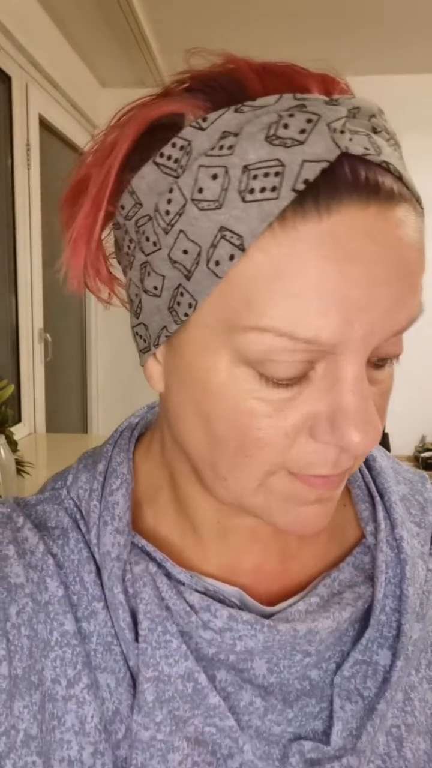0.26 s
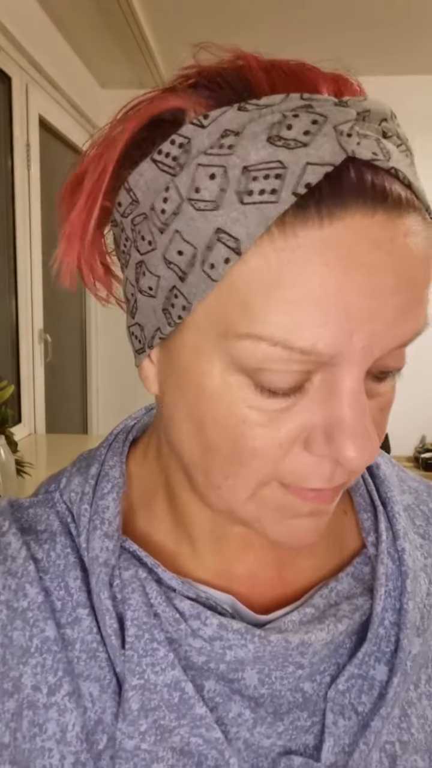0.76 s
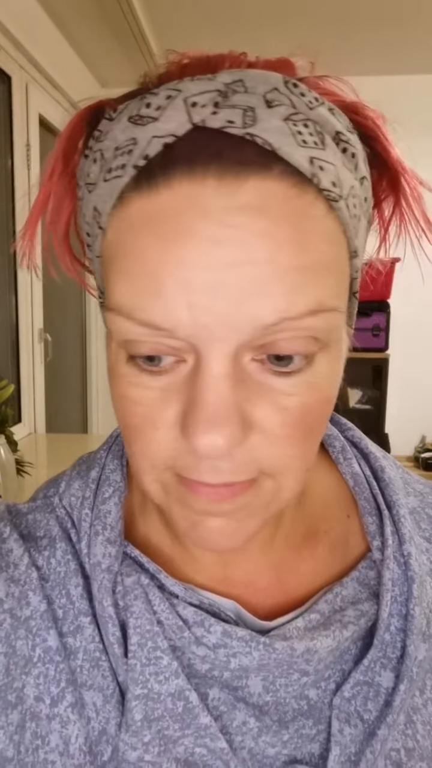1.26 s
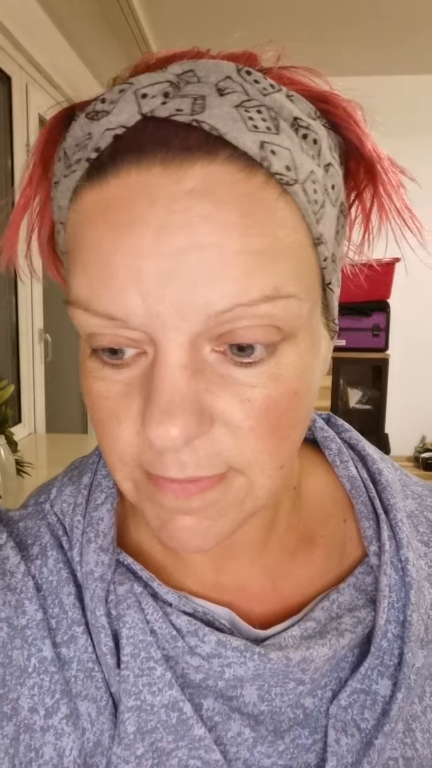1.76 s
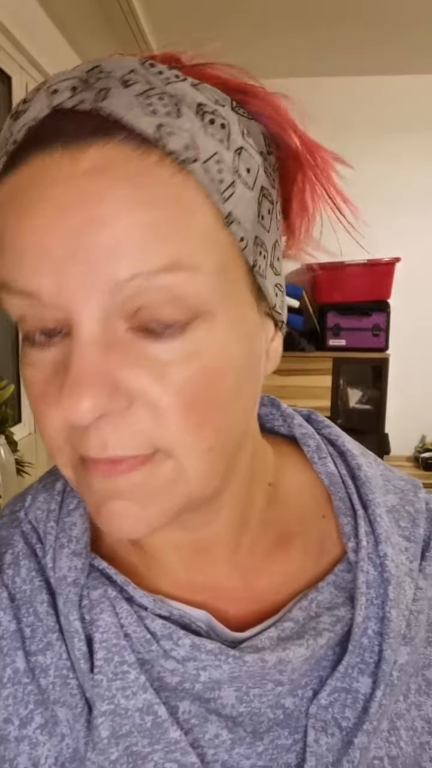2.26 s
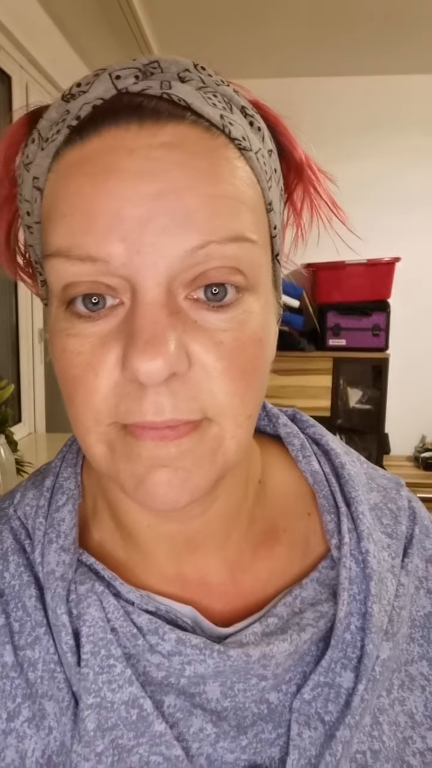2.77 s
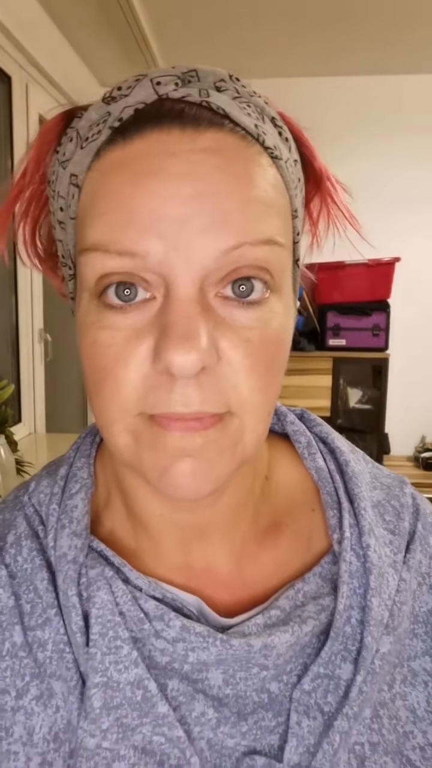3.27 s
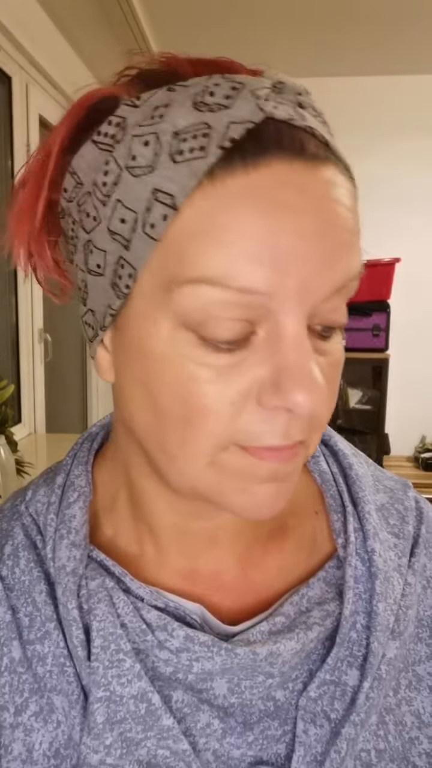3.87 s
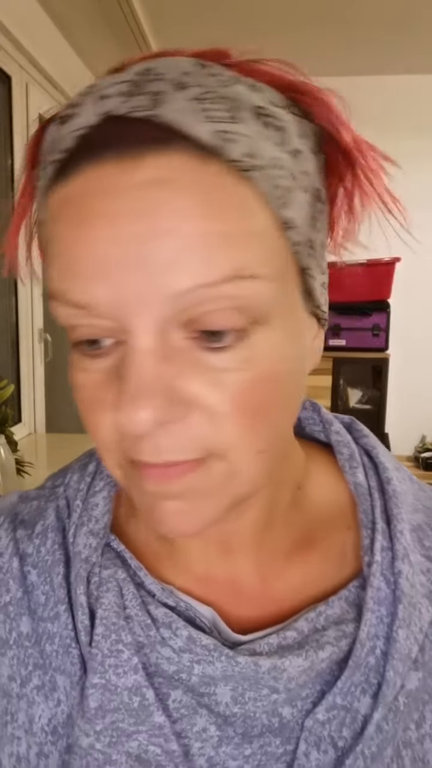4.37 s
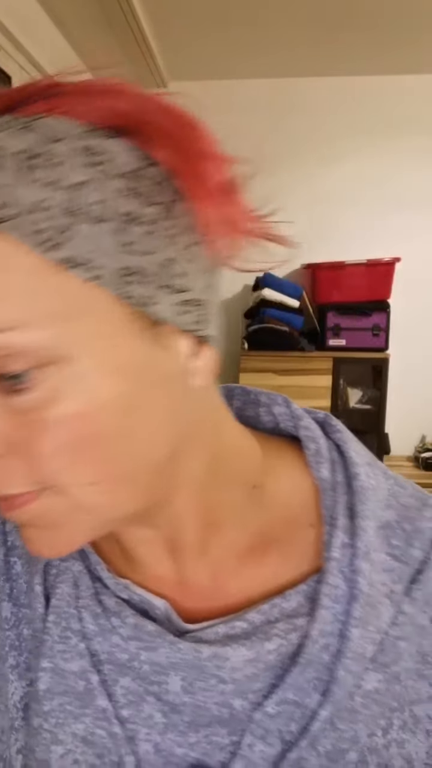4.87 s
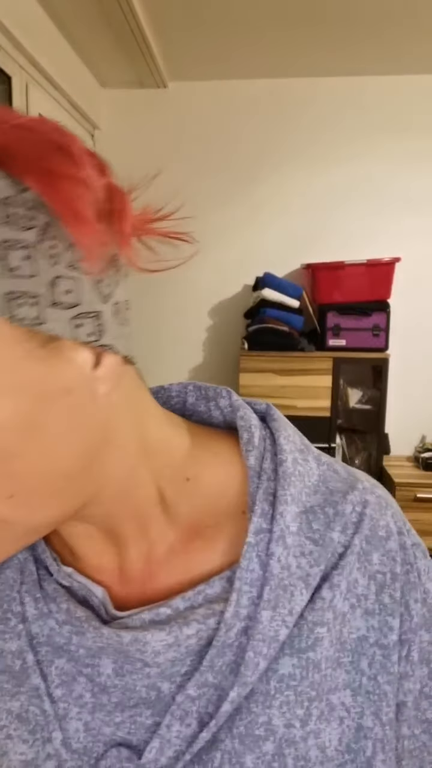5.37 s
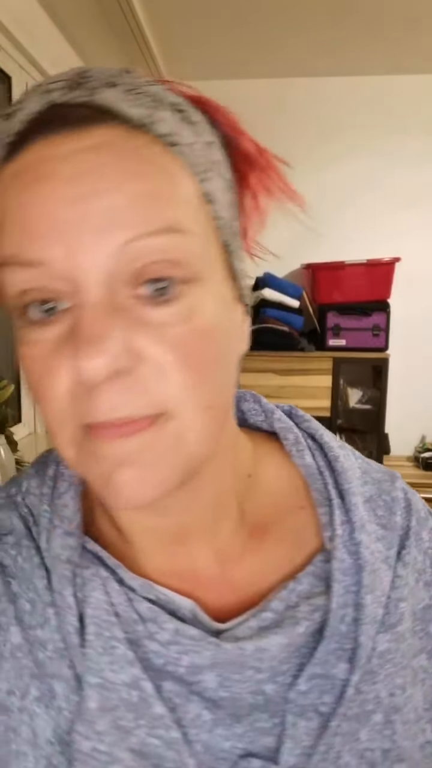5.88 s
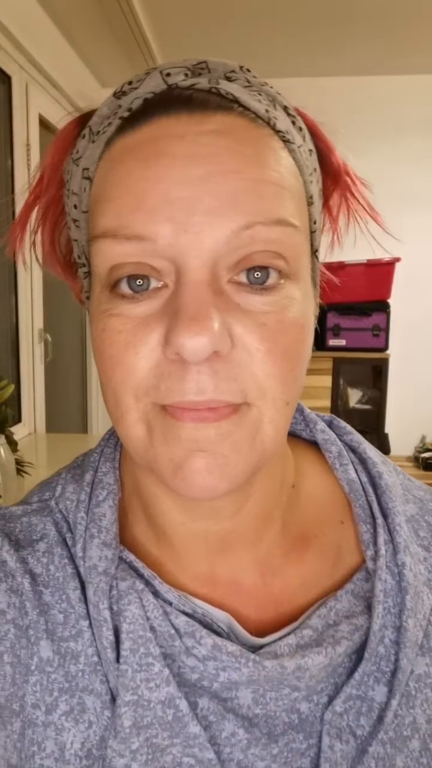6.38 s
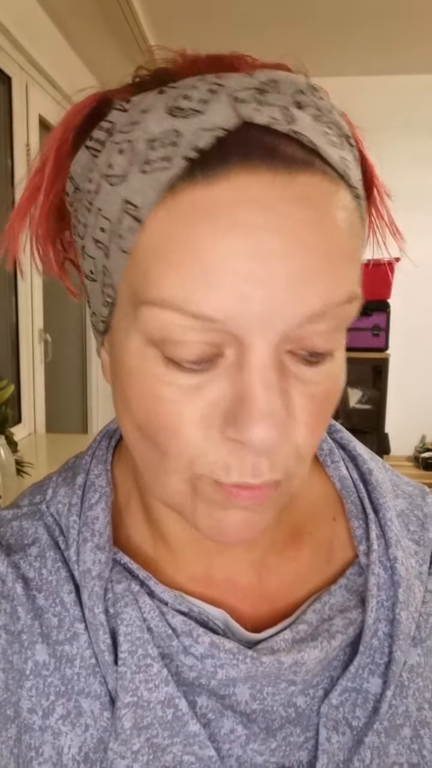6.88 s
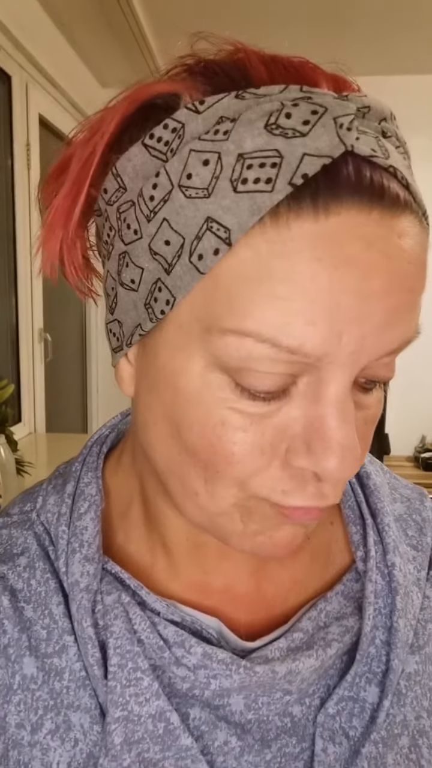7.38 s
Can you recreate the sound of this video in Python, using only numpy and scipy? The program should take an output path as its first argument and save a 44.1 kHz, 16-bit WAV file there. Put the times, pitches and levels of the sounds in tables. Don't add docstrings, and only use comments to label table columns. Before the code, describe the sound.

A quiet furnished room, close phone microphone, soft steady hiss and low room tone. At 0.06 s a glass jar clinks clearly with a hollow knock. Sliding leads to a firm flat knock at 0.4, then a tight burst from 0.55 to 0.68, the loudest, with sharp plastic cracks, low thuds and a short rattle. A firm drop falls at 1.06, light taps around 1.4, small clicks and a scrape at 1.55 to 1.7. A case clatters down hard at 2.4, with a very faint glass clink at 2.53. Paired taps come at 3.37 to 3.58, a dull bump at 4.2 and a small tick at 4.4. Around 5 to 5.25 there are tiny bright ticks and cloth brushing. From 5.98 to 7.03 items shuffle in a tray with many soft, dull knocks and a brief low squeak near 6.5. Light plastic clicks at 7.25 to 7.45 end it.

```python
import sys
import numpy as np
from scipy import signal
from scipy.fft import rfft, irfft, next_fast_len
from scipy.io import wavfile
from scipy.ndimage import uniform_filter1d

SR = 44100
rng = np.random.default_rng(int(sys.argv[2]) if len(sys.argv) > 2 else 0)


def gain_from_db(level_db):
    decades = np.asarray(level_db, float) / 20
    return 10 ** decades


def file_out(sig):
    cols = np.atleast_2d(sig).T
    lim = np.clip(cols, -1, 1)
    pcm = np.round(lim * 32767).astype(np.int16)
    wavfile.write(sys.argv[1], SR, pcm)


N = 335733
LENGTH, TOP_HZ = 8192, 15250
FADE_DB, STILL_DB = 17.5, -75
SPREAD_DB = 3
HIT_DELAY_S = .0008


def peak_one(x):
    return x / (np.max(np.abs(x)) + 1e-12)


def rms_one(x):
    return x / np.sqrt(np.mean(x ** 2) + 1e-20)


def at_hz(points, hz):
    f, value = np.transpose(points)
    return np.interp(np.log(hz), np.log(f), value)


def band(x, low_hz, high_hz):
    return signal.sosfilt(signal.butter(2, [low_hz, high_hz], "band", fs=SR, output="sos"), x)


def coloured(spectrum):
    size = next_fast_len(N)
    hz = np.maximum(np.fft.rfftfreq(size, 1 / SR), 1)
    inside = (hz > spectrum[0][0]) & (hz < min(spectrum[-1][0], TOP_HZ))
    white = rfft(rng.standard_normal(size))
    return rms_one(irfft(white * gain_from_db(at_hz(spectrum, hz)) * inside, size)[:N])


def flicker(rate_hz):
    knots = rng.standard_normal(2000)
    return np.interp(np.arange(N) / SR * rate_hz, np.arange(len(knots)), knots)


def humps(s, level_db, swell_s, hold_s, fade_s, rest_db):
    step = 32
    t = np.arange(0, N, step)[:, None] / SR
    away = np.maximum((s - t) / swell_s, (t - s - hold_s) / fade_s)
    each_db = level_db - FADE_DB * np.maximum(away, 0)
    loudest_db = np.maximum(each_db.max(axis=1), rest_db)
    leader = each_db.argmax(axis=1)[np.arange(N) // step]
    return np.interp(np.arange(N) / SR, t[:, 0], loudest_db), leader


def struck(push, modes, strengths_db):
    t = np.arange(LENGTH) / SR
    hz, level_db, t60 = np.transpose(modes)[:, :, None]
    rings = gain_from_db(level_db + strengths_db[:, None] - 60 * t / t60) * np.sin(2 * np.pi * hz * t)
    return peak_one(signal.fftconvolve(rings.sum(axis=0), push)[:LENGTH])


def add(out, sound, s):
    i = round(s * SR)
    out[i:i + LENGTH] += sound[:N - i]


# t/s, knock peak/dB, crack re knock/dB, knock pitch f/Hz
DROPS = [
    (0.3949, -27.5, -17, 406),
    (.597, -34, -4, 590),
    (.638, -17.5, -2.5, 610),
    (1.063, -24.5, -5.5, 435),
]
CLATTERS = [(1.524, -56.5, -8, 594), (1.556, -49, 5, 515), (1.66, -50.5, -15, 285), (1.736, -59, -17, 365),
            (2.3923, -22.5, -12, 407), (2.397, -23, -5.5, 410), (3.041, -56.5, 0.5, 600),
            (5.835, -52.5, 6, 450), (7.246, -38, -12, 600), (7.427, -48, 9, 370)]
HOLLOWS = [(.064, -27.5, 5.5, 718), (0.409, -34, -36, 276), (.559, -21.5, -15.5, 445),
           (0.938, -43, -29, 433), (1.385, -32.5, 0.5, 418), (2.116, -52.5, -2, 370),
           (2.527, -42.5, 8.5, 248), (3.508, -44, -21, 393), (3.532, -32.5, -5, 305), (3.807, -52, -6, 458),
           (4.315, -54, -8, 247), (4.374, -45.5, -22, 243), (4.395, -50.5, 1, 283), (5.978, -34, -39, 642)]
TAPS = [(.4, -21, -5.5, 323), (0.567, -35, -3, 420), (.591, -26.5, -5.5, 610), (.657, -23, 4.5, 407),
        (.676, -29, -9, 406), (1.3687, -28.5, -10, 450), (1.428, -37.5, -4.5, 505), (1.692, -50.5, -6, 290),
        (2.041, -59, -22, 430), (2.156, -48.5, -5, 520), (2.382, -32, -9, 430), (3.3654, -33.5, 4, 487),
        (3.472, -38.5, -7.5, 434), (3.5788, -31.5, -7.5, 443), (4.988, -58.5, 16.5, 470),
        (5.038, -62.5, 14, 368), (5.932, -49.5, -3, 498), (6.348, -47.5, -6.5, 474),
        (7.264, -33.5, -8, 429.4), (7.286, -30.5, -6, 394), (7.446, -41, 0, 310)]
BUMPS = [
    (1.161, -51.5, 2.5, 422),
    (2.367, -43.5, 8, 332),
    (3.377, -30, -42, 450),
    (3.478, -38, -20, 406),
    (4.2054, -32.5, -14, 325),
    (5.177, -52, 5, 394),
]
SHUFFLES = [(5.997, -31.5, -8, 306), (6.029, -40, -16, 390), (6.058, -31.5, -17, 370),
            (6.125, -42.5, -9, 435), (6.214, -36, 1.5, 600), (6.22, -26.5, -13, 498), (6.23, -31, -21, 510),
            (6.257, -34.5, -13, 520), (6.309, -47.5, -4.5, 490), (6.431, -45.5, -37, 406),
            (6.462, -38, -19, 425), (6.498, -45, -3.5, 484), (6.603, -35, 1, 424), (6.776, -33, -17.5, 317),
            (6.843, -37.5, -14, 340), (6.956, -35.5, -8, 460), (7.028, -30.5, -12.5, 380)]
# lid/dB, shell re knock/dB, lid and shell share of crack dB, share of free ring time
GRIPS = [
    (0, -8, 0.017, 0.05, 1),
    (2, -1, 0.017, 0.055, 1),
    (-3, -13, 0.091, 0.18, 1),
    (-13, -4, .02, 0.22, 0.96),
    (-8.5, -18, 0.096, 0.17, .9),
    (-10.5, -18, 0.32, 0.19, 1),
]


def all_contacts():
    kinds = [DROPS, CLATTERS, HOLLOWS, TAPS, BUMPS, SHUFFLES]
    for rows, (lid_db, shell_db, lid_share, shell_share, free) in zip(kinds, GRIPS):
        for s, knock_db, crack_db, hz in rows:
            lid = lid_db + lid_share * crack_db
            shell = shell_db + shell_share * crack_db
            yield s, knock_db, lid, shell, crack_db, hz, free


# f/Hz, level/dB, t60/s
TABLE = [(238, -22, 0.049), (340.5, -8.5, 0.11), (420.3, -1.5, 0.11), (455, -9.5, 0.089),
         (516.4, -6.5, 0.12), (600, -0.5, 0.057)]
# f/Hz, level/dB, t60/s
LID = [(530, 12, 0.0047), (789, -4, 0.059), (868, -0.5, .05), (908, 8, 0.028), (1020, -1, 0.026),
       (1131, -6.5, 0.047)]
# f/Hz, level/dB, t60/s
CASE = [(1300, 14.5, 0.049), (1526, 14.5, 0.024), (1733, 11, 0.023), (1935, 20, 0.0054), (2490, 9, 0.013),
        (2720, -10, 0.077), (3360, -66, 0.03)]
# f/Hz, level/dB per Hz
CRACK = [(1880, -4), (3200, 3), (4050, -8), (4830, 5.5), (6520, -7), (7930, 0.5), (8690, -5.5),
         (10300, -19.5), (12100, -19.5), (13200, -16), (15200, -21)]


def contacts():
    out, t, crack = np.zeros(N), np.arange(LENGTH) / SR, coloured(CRACK)
    settle = np.exp(-t / .003)
    snap_shape = (1 - np.exp(-t / 0.00038)) * (0.65 * np.exp(-t / 0.00054) + 0.29 * np.exp(-t / 0.0038))
    table_hz = np.array(TABLE)[:, 0]
    for s, knock_db, lid_db, shell_db, crack_db, hollow_hz, free in all_contacts():
        uneven = rng.standard_normal(LENGTH) ** 3
        chance_db = SPREAD_DB * rng.standard_normal((3, len(CASE)))
        push = (uneven * settle * 0.2 + (t == 0) * 2.63)[:LENGTH // 4]
        soft = np.convolve(push, np.hanning(round(.5 * SR / hollow_hz) + 2))
        nearness_db = -8.0 * np.abs(np.log2(table_hz / hollow_hz))
        body = np.array(TABLE + [(hollow_hz, 3.0, 17.0 / hollow_hz)]) * [1, 1, free]
        knock = struck(soft, body, np.append(nearness_db + chance_db[0, :len(TABLE)], 0))
        knock = peak_one(band(band(knock, 0.58 * hollow_hz, 5.4 * hollow_hz), 235, 1200))
        lid = peak_one(band(struck(push, LID, chance_db[1, :len(LID)]), 532, 1350))
        shell = peak_one(band(struck(push, CASE, chance_db[2, :len(CASE)]), 1490, 2960))
        i = min(round(s * SR), N - LENGTH)
        snap = peak_one(crack[i:i + LENGTH] * snap_shape)
        snap = peak_one(band(snap, 1500 * 2 ** np.clip(crack_db / 5.0, 0, 1.5), TOP_HZ))
        hit = knock + gain_from_db(lid_db + 1.5) * lid + gain_from_db(shell_db) * shell + gain_from_db(crack_db) * snap
        add(out, gain_from_db(knock_db) * hit, s + HIT_DELAY_S)
    return out


# t/s, peak/dB, f/Hz
THUDS = [(0.065, -34.5, 260), (0.397, -34.5, 124), (0.562, -40, 136), (0.637, -29.5, 236),
         (0.657, -30, 227), (1.06, -42, 134), (1.37, -49, 70.4), (2.117, -47.5, 42.5), (2.393, -28, 198.7),
         (3.533, -38.5, 236), (4.205, -42.5, 242)]


def thuds():
    out = np.zeros(N)
    for s, level_db, hz in THUDS:
        push = np.hanning(round(.4 * SR / hz))
        modes = [(hz, 0, .13), (1.77 * hz, -4, .09)]
        add(out, gain_from_db(level_db + 2.0) * struck(push, modes, np.zeros(2)), s)
    return out


# t/s, peak/dB, f/Hz, t60/s
PINGS = [(0.4007, -21.5, 6020, 0.022), (1.385, -32, 5400, 0.013), (4.9885, -45, 5350, 0.014),
         (1.557, -23, 1620, 0.012), (1.6596, -33, 1600, 0.023), (5.8357, -38.5, 1280, 0.036),
         (7.2468, -24, 1570, 0.01), (7.444, -27.5, 1420, 0.01), (.383, -40, 7400, .02),
         (0.411, -43, 4600, 0.012), (0.5604, -28, 4670, 0.011), (.6385, -15, 4870, 0.0096),
         (.6585, -14, 7640, 0.0075), (.6587, -16, 2070, .012), (.677, -33, 4900, 0.015),
         (1.525, -46, 3040, .012), (1.5572, -36.5, 2670, 0.019), (1.661, -37, 940, 0.026),
         (1.735, -42, 1290, .015), (2.368, -47, 4850, 0.0081), (2.3935, -29, 4800, 0.0071),
         (2.3985, -24, 4660, 0.0073), (2.538, -35, 4520, 0.014), (2.5375, -53, 2780, .15),
         (5.178, -26.5, 6000, .004), (5.979, -49, 3000, 0.044), (6.215, -31.5, 3190, .012),
         (6.348, -45.5, 1774, 0.013), (6.603, -36, 3150, .012), (6.955, -42, 7500, 0.011),
         (7.2622, -34, 7450, 0.013), (7.287, -23, 940, 0.021), (4.99, -50, 13400, .004),
         (.66, -18, 983, 0.041), (1.064, -24, 1810, 0.0083), (1.3705, -30, 2800, .012),
         (1.385, -41, 7530, .012), (3.348, -44, 8040, .008), (3.366, -37, 5190, 0.01),
         (3.475, -45, 7900, .012), (3.475, -36, 1410, .015), (3.512, -43, 1300, .02),
         (4.318, -46, 14500, .006), (4.318, -50, 4900, .006), (7.2475, -33, 800, 0.024),
         (6.0, -46, 5040, 0.034), (6.2155, -30.5, 5000, 0.017), (2.397, -20.5, 1500, 0.027),
         (2.13, -62, 1200, .02), (2.258, -53, 1200, .02), (4.99, -46, 2020, 0.0079)]


def pings():
    out = np.zeros(N)
    for s, level_db, hz, t60 in PINGS:
        size = round(1.5 * SR / hz) + 2
        push = np.hanning(size) * np.sin(2 * np.pi * hz / SR * np.arange(size))
        modes = [(hz, 0, t60), (0.75 * hz, -4, t60)]
        add(out, gain_from_db(level_db - 6.0) * struck(push, modes, np.zeros(2)), s + HIT_DELAY_S)
    return out


# t/s, peak/dB
CLINKS = [
    (0.0644, -21.5),
    (2.528, -38),
]
# f/Hz, level/dB, t60/s
JAR = [(2792, 13.5, 0.06), (2780, -3, 0.14), (3100, 0, 0.089), (4110, -6.5, 0.2), (4870, -25, .08),
       (5580, -19.5, 0.055), (6230, 14, 0.051), (6540, 14, 0.037), (6650, 0, 0.36), (8090, -21, .12),
       (11250, -11, 0.19)]


def jar():
    out = np.zeros(N)
    for s, level_db in CLINKS:
        add(out, gain_from_db(level_db + 0.5) * struck(np.ones(1), JAR, rng.standard_normal(len(JAR))), s)
    return out


# t/s, level/dB, fade/s, upper edge f/Hz
RATTLES = [(.068, -48, 0.048, 6500), (.4, -46, 0.041, 3000), (.643, -39, 0.018, 4000),
           (.665, -40, 0.063, 5900), (1.068, -48, .05, 2480), (2.397, -37.5, .04, 2315),
           (3.37, -55.5, 0.054, 3000), (3.585, -55, 0.054, 3000), (6.0, -58.5, 0.054, 1500),
           (6.225, -56, 0.08, 1600), (7.29, -52, 0.036, 2000)]


def rattles():
    out, t = np.zeros(N), np.arange(LENGTH) / SR
    knocks_per_s, low_hz = 2500, 520
    for s, level_db, fade_s, top_hz in RATTLES:
        knocks = (rng.random(LENGTH) < knocks_per_s / SR) * rng.standard_normal(LENGTH)
        knocks = knocks * gain_from_db(3.8 * rng.exponential(1, LENGTH))
        shower = rms_one(band(knocks + 1e-18, low_hz, top_hz))
        add(out, gain_from_db(level_db - FADE_DB * t / fade_s) * (1 - np.exp(-t / 0.0015)) * shower, s)
    return out


def friction(rows, width_hz, upper_db):
    s, level_db, fade_s, hz = np.transpose(rows)
    swell_s = 0.27 * fade_s
    level_db, leader = humps(s, level_db, swell_s, 0, fade_s, rest_db=-120)
    level = uniform_filter1d(gain_from_db(level_db), size=300)
    pitch_hz = hz[leader]
    turn = 2 * np.pi * np.cumsum(pitch_hz) / SR
    low_pass = signal.butter(2, width_hz, fs=SR, output="sos")
    wide = signal.sosfilt(low_pass, rng.standard_normal((2, N)))
    main = wide[0] * np.cos(turn) + wide[1] * np.sin(turn)
    upper = gain_from_db(upper_db) * wide[1] * np.cos(1.8 * turn) * (pitch_hz < TOP_HZ / 4)
    return level * gain_from_db(-3.5 + 4.0 * flicker(80)) * rms_one(main + upper)


# t/s,
# level/dB, fade/s, resonance f/Hz
SCRAPES = [(.32, -58.5, 0.077, 1300), (1.57, -52.5, 0.064, 1502), (1.664, -42.5, 0.0098, 1472),
           (1.69, -53, 0.094, 1450), (1.874, -55.5, 0.04, 1523), (2.11, -65.5, .25, 1210),
           (2.254, -55.5, 0.039, 1200), (2.41, -43.5, 0.09, 1400), (7.04, -51, 0.041, 1220),
           (5.24, -54, 0.038, 4340), (6.505, -53.5, 0.025, 3000), (1.84, -55.5, 0.04, 1347),
           (5.19, -54.5, .04, 6100), (5.22, -57.5, 0.049, 13400), (4.39, -56.5, .08, 7700),
           (6.06, -59, 0.068, 5000)]


def scrapes():
    return friction(SCRAPES, width_hz=183, upper_db=-19)


# t/s, level/dB, fade/s, resonance f/Hz
SQUEAKS = [(.29, -63, .12, 3520), (2.12, -60.5, .15, 1200), (3.82, -67, .08, 1180),
           (5.28, -68.5, 0.33, 350), (6.16, -68.5, .08, 1870), (6.2, -60, 0.057, 1880),
           (6.4, -67, 0.058, 1850), (5.83, -59, 0.0616, 330), (6.49, -44.5, .07, 520),
           (6.54, -67, .03, 2700)]


def squeaks():
    return friction(SQUEAKS, width_hz=42, upper_db=-30)


# t/s, level/dB, fade before and after/s
LEANS = [(0, -43, 0.15), (.4, -46.5, 0.35), (.53, -44, 0.11), (.66, -38.5, 0.13), (.78, -47.5, 0.17),
         (1.02, -49.5, 0.47), (1.55, -65, 0.94), (2.15, -57.5, 0.15), (2.41, -49.5, 0.073), (2.69, -68, .3),
         (3.409, -63.5, 0.5), (3.6, -50, 0.14), (4.26, -51.5, 0.2), (4.6, -66, 0.69), (5.2, -69.5, .6),
         (5.62, -65, 0.56), (5.98, -58.5, 0.14), (6.3, -61, 0.9), (6.6, -63, 0.54), (6.06, -53.5, 0.13),
         (7.5, -62, 0.22), (6.95, -62.5, 0.35), (7.27, -56, 0.13)]
# t/s, level/dB, fade before and after/s, plastic scuff re drag/dB
SLIDES = [(.03, -53, 0.41, -0.5), (.36, -49.5, 0.21, -6), (.53, -39, 0.062, -9.5), (.78, -46, 0.17, -5.5),
          (1.02, -53.5, 0.33, -9), (1.55, -57.5, 0.26, -7.5), (1.88, -63, 0.15, -6), (2.2, -60.5, 0.2, -3),
          (2.43, -60, 0.22, -2.5), (3.41, -58.5, 0.3, -7), (3.52, -47, 0.1, -5), (3.65, -48.5, 0.1, -7.5),
          (4.09, -72.5, 0.2, 5), (4.26, -58, .3, -18), (5.17, -64, 0.19, -17), (5.98, -49.5, 0.073, -13),
          (6.17, -55, 0.33, -12), (6.35, -62.5, 0.43, -6), (6.59, -54, 0.26, -11.5),
          (6.95, -54.5, 0.34, -15.5), (7.3, -57, 0.26, -8), (7.48, -51, 0.096, -6)]
# f/Hz, level/dB per Hz
RUMBLE = [(21, -7), (35, -16), (59, -15.5), (129, 1.5), (216, -4), (280, -18), (360, -60), (620, -120)]
DRAG = [(140, -36), (240, -1), (413, 10), (598, -1.5), (683, -7), (771, -24), (900, -28), (1170, -34),
        (1980, -120)]
SCUFF = [(410, -59), (700, -3), (1070, -4.5), (1320, -6), (1740, -9), (2020, -17), (2800, -9.5),
         (3640, -59), (6160, -120)]
RUSTLE = [(1180, -18), (2000, -7.5), (2330, -22.5), (3010, -3), (3910, -11), (4300, -2.5), (4640, -1.5),
          (6740, -5), (7600, 2.5), (9000, -10.5), (11900, -13.5), (13500, -7), (15200, -9)]


def sliding():
    s, lean_db, fade_s = np.transpose(LEANS)
    rumble_db, _ = humps(s, lean_db, fade_s, 0, fade_s, STILL_DB)
    s, slide_db, fade_s, plastic_db = np.transpose(SLIDES)
    drag_db, _ = humps(s, slide_db, fade_s, 0, fade_s, STILL_DB)
    scuff_db, _ = humps(s, slide_db + plastic_db, fade_s, 0, 0.77 * fade_s, STILL_DB - 3)
    grain = flicker(70)
    rumble = gain_from_db(rumble_db - 1.5 + 2 * flicker(30)) * coloured(RUMBLE)
    drag = gain_from_db(drag_db - 6.5 + 1.6 * flicker(33)) * coloured(DRAG)
    scuff = gain_from_db(scuff_db - 1.5 + 2 * grain) * coloured(SCUFF)
    rustle = gain_from_db(scuff_db - 11.5 + grain + flicker(160)) * coloured(RUSTLE)
    return rumble + drag + scuff + rustle


# t/s, level/dB, swell/s, hold/s, fade/s
STROKES = [(.0, -60, .01, 0.045, .13), (.5, -67, 0.26, 0.058, 0.091), (.665, -51, 0.0025, .002, 0.013),
           (.7, -67, .02, 0.018, 0.059), (1.0, -69, 0.029, 0.061, 0.34), (1.55, -70, 0.043, .02, 0.14),
           (2.14, -66, 0.028, 0.13, .04), (2.559, -63, 0.061, 0.011, 0.077),
           (3.63, -64.5, 0.26, 0.017, 0.016), (4.395, -56, 0.082, 0.01, 0.11),
           (5.18, -48.5, 0.043, 0.053, 0.055), (5.244, -52.5, 0.041, 0.024, 0.012),
           (5.085, -62, .03, 0.073, .03), (5.09, -68.5, .1, 0.49, 0.17), (6.051, -57.5, 0.022, .002, 0.054),
           (6.1, -62, 0.28, 0.02, .2), (6.51, -59.5, 0.084, 0.0019, 0.038), (6.84, -66, 0.17, .005, 0.027),
           (7.33, -62, 0.17, 0.0088, 0.045), (7.425, -48.5, 0.0095, 0.01, 0.045),
           (7.02, -59.5, 0.071, 0.0075, 0.015), (7.275, -58, 0.019, 0.023, .03),
           (.72, -64.5, .03, 0.039, 0.04), (4.352, -58.5, .005, 0.012, .04)]


def brushing():
    level_db, _ = humps(*np.transpose(STROKES), rest_db=-120)
    level = uniform_filter1d(gain_from_db(level_db), size=200)
    cloth, edges_hz = coloured(RUSTLE), [1500, 3600, 6500, 10500, 15400]
    patches, sign = np.zeros(N), 1
    for low_hz, high_hz in zip(edges_hz, edges_hz[1:]):
        patches += sign * gain_from_db(3.6 * flicker(30)) * band(cloth, low_hz, high_hz)
        sign = -sign
    return level * gain_from_db(-1.0 + 0.79 * flicker(35) + 2.9 * flicker(340)) * rms_one(patches)


# f/Hz, t60/s
ROOM = [(150, 0.46), (500, 0.4), (1500, 0.48), (4000, 0.45), (9000, 0.26), (15000, 0.31)]


def room(x):
    gap_s, shift_hz = 0.0018, 32
    t, edges_hz = np.arange(SR // 2) / SR, 80 * 2. ** np.arange(8.1)
    echoes = 0
    for low, high in zip(edges_hz, np.minimum(edges_hz[1:], .45 * SR)):
        decay = gain_from_db(-60 * t / at_hz(ROOM, np.sqrt(low * high)))
        echoes = echoes + band(rng.standard_normal((2, len(t))), low, high) * decay
    echoes = echoes * np.clip(t / gap_s - 1, 0, 1)
    echoes = echoes / np.sqrt(np.sum(echoes ** 2) / 2)
    one, other = signal.fftconvolve(x[None], echoes, axes=1)[:, :N]
    shift = 2 * np.pi * np.cumsum(shift_hz * (1 + .5 * flicker(10))) / SR
    return one * np.cos(shift) + other * np.sin(shift)


# f/Hz, level/dB per Hz
HUSH = [(12, -34), (20, 9.5), (90, -7), (212, -10.5), (296, -11.5), (359, -13), (2180, -26), (2800, -24),
        (3700, -31.5), (4750, -23), (6270, -33.5), (8050, -28.5), (10100, -41.5), (13300, -29),
        (15200, -28.5)]


def hush():
    return gain_from_db(-61 - 2.0 + 2.9 * flicker(4.3)) * coloured(HUSH)


# f/Hz, level/dB
WHINE = [(8075, -91)]


def whine():
    t = np.arange(N) / SR
    return sum(.5 * gain_from_db(level_db) * np.sin(2 * np.pi * hz * t) for hz, level_db in WHINE)


def scene():
    hits = contacts() + thuds() + pings() + jar() + scrapes()
    rubbing = sliding() + brushing() + squeaks()
    return (hits + gain_from_db(-9.5) * room(hits) + rattles() + rubbing + hush() + whine())[None]


def top_cut(x):
    return signal.sosfilt(signal.butter(12, 16370, fs=SR, output="sos"), x)


def record(dry):
    return top_cut(dry)


dry = scene()
out = record(dry)
file_out(out)
```